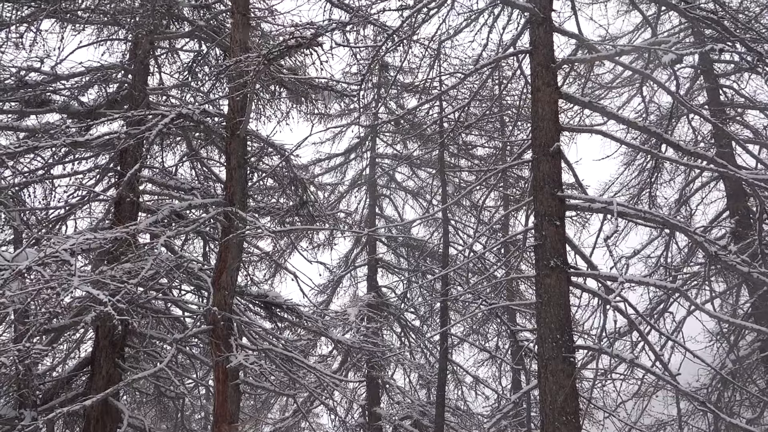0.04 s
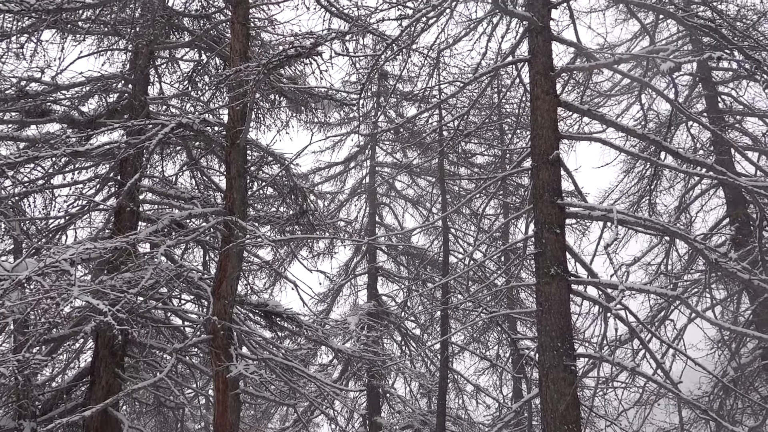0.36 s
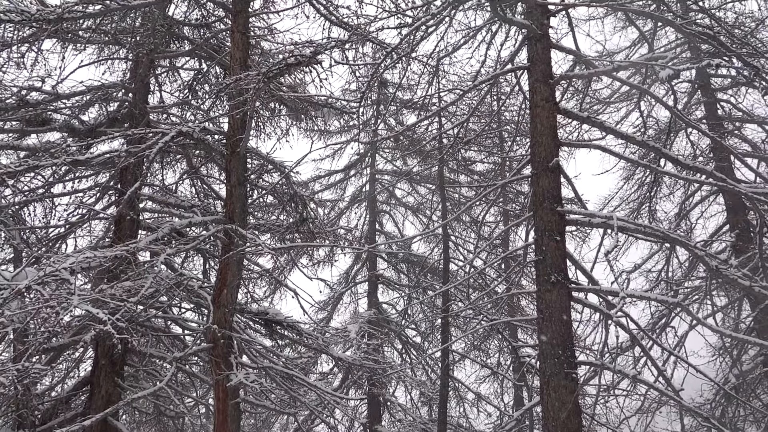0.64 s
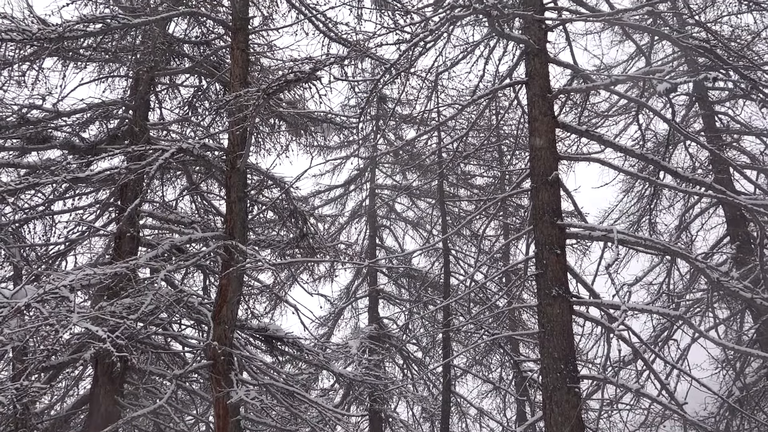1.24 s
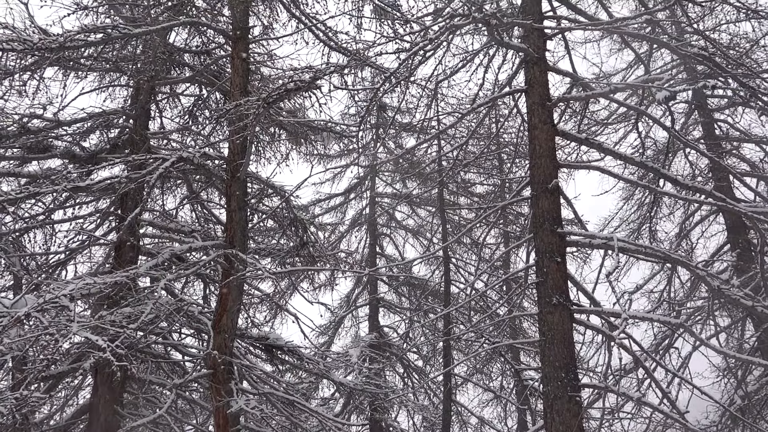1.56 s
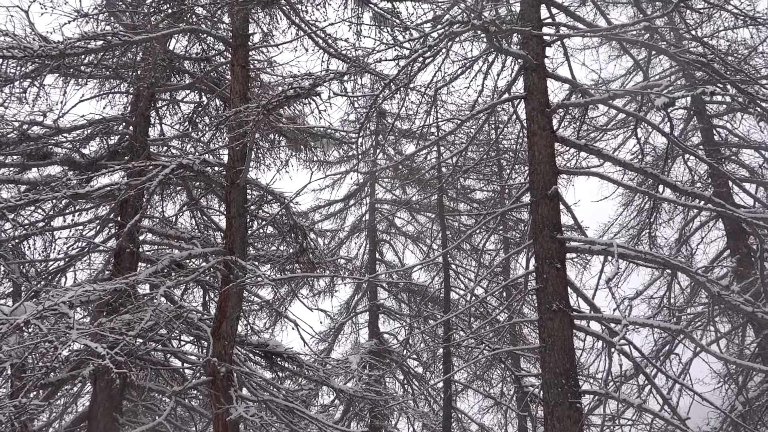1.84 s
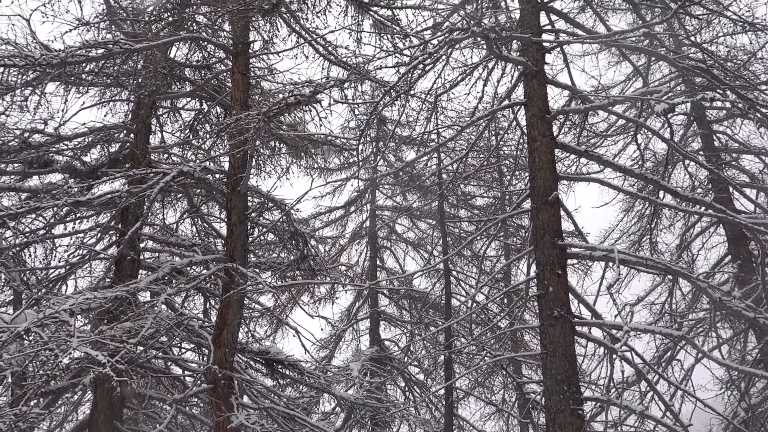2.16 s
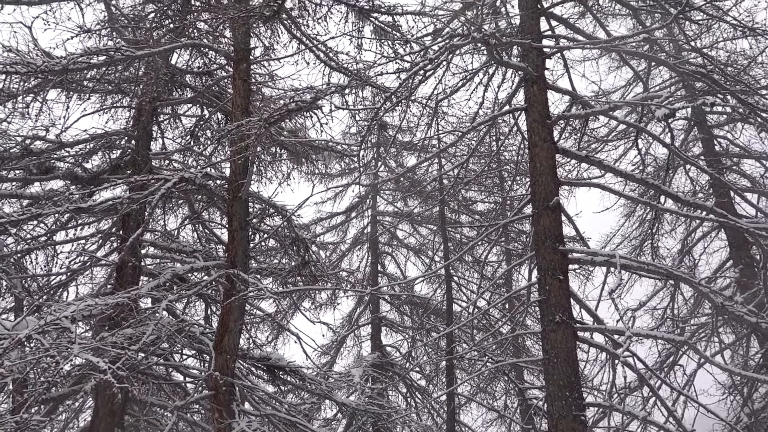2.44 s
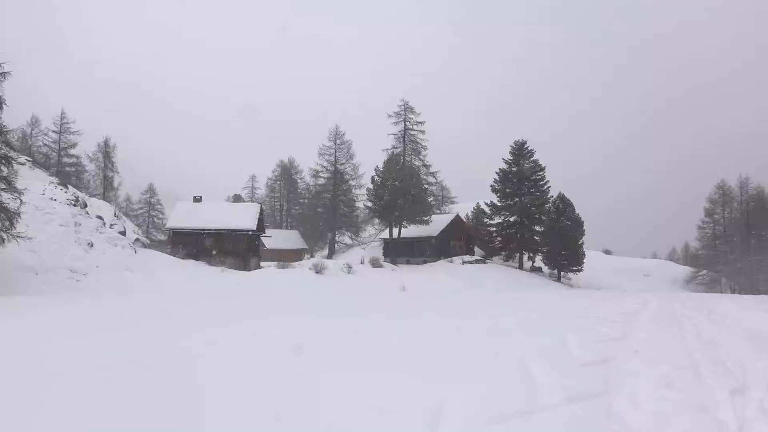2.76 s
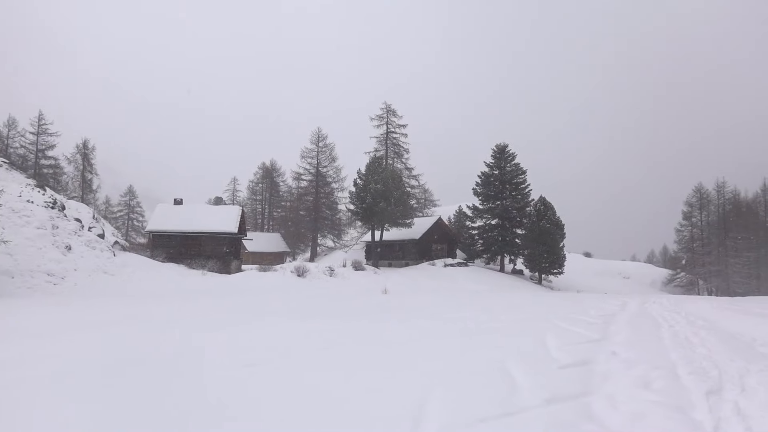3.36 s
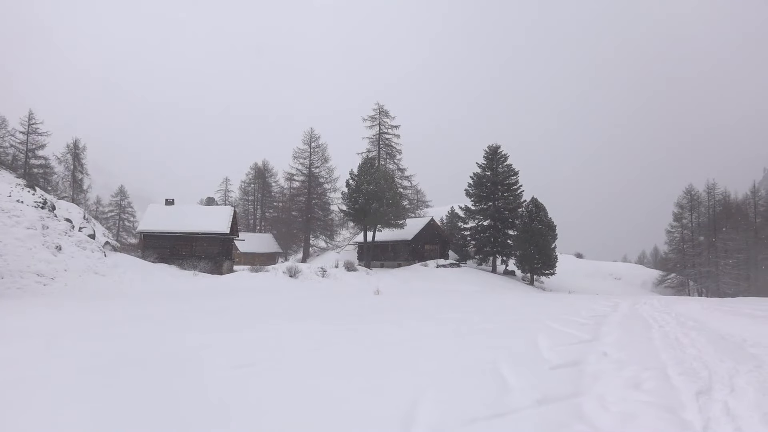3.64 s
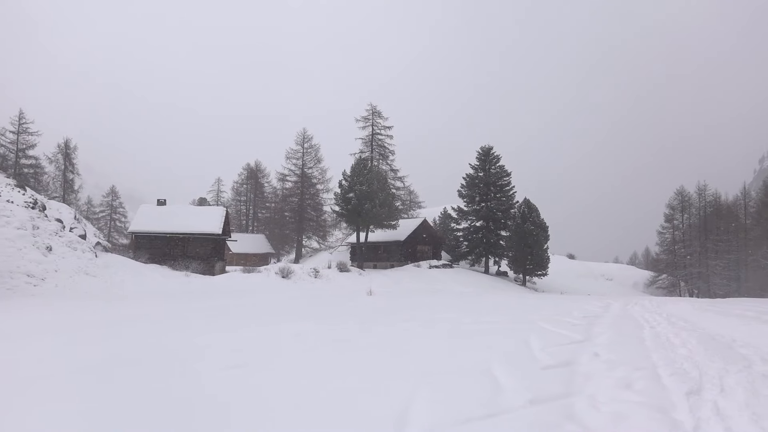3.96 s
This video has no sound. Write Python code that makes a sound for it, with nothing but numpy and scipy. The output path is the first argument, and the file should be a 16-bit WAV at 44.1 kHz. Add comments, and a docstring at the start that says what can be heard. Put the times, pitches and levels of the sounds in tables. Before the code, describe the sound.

Low wind rumbles and thumps on the microphone in snowy woods, over a soft hush, tiny snow ticks and light twig clicks. A gust passes, then the rumble continues in an open field with hardly any ticks.

```python
"""Snowy woods in the wind, heard by one microphone. Swirls of air rumble and thump on it, the trees
give a soft hush, grains of snow tick close by and twigs knock together. A gust rushes past after
about a second. Near the end the sound dips briefly and moves to an open field: duller air,
much the same rumble, hardly a tick."""
import sys
import numpy as np
from scipy import signal
from scipy.fft import rfft, irfft
from scipy.io import wavfile
from scipy.ndimage import uniform_filter1d

SR = 44100
rng = np.random.default_rng(int(sys.argv[2]) if len(sys.argv) > 2 else 0)


def waveform_to_disk(signal):
    """Save audio, clipped to [-1, 1], as 16-bit WAV at the path in sys.argv[1]."""
    frames = np.transpose(np.atleast_2d(signal))
    scaled = np.clip(frames, -1, 1) * 32767
    samples = np.round(scaled).astype(np.int16)
    wavfile.write(sys.argv[1], SR, samples)


N = 176400
T = np.arange(N) / SR
CHANGE_S = 2.838  # when the woods give way to the field


def amp(db):
    """Turn decibels into a number to multiply a sound by."""
    return 10 ** (np.asarray(db) / 20)


def curve(rows):
    """A volume that follows rows of time in seconds and level in dB."""
    return amp(np.interp(T, *np.array(rows).T))


def noise(colour):
    """Noise of strength 1, its tone shaped by rows of pitch in Hz and level in dB."""
    hz, db = np.array(colour, float).T
    freqs = np.maximum(np.fft.rfftfreq(N, 1 / SR), 1)
    gains = amp(np.interp(np.log(freqs), np.log(hz), db))
    shaped = irfft(rfft(rng.standard_normal(N)) * gains, N)
    return shaped / shaped.std()


def wander(per_s):
    """A smooth random drift, about 1 in size, that heads for a new value per_s times a second."""
    hold = max(int(SR / per_s), 2)
    steps = np.repeat(rng.standard_normal(N)[:N // hold + 1], hold)
    drift = uniform_filter1d(steps, hold)[:N]
    return drift / drift.std()


def add(out, start_s, sound):
    """Mix a short sound in at a given time."""
    i = int(np.clip(start_s * SR, 0, N - 1))
    out[i:i + len(sound)] += sound[:N - i]


def tap(hz, db, cycles):
    """One small contact: a short ring, strongest after the given cycles, and a faint noisy tail."""
    tail_db, tail_s = -25, .003
    t = T[:700]
    age = t * hz / cycles
    ring = np.sin(2 * np.pi * hz * t) * (age * np.exp(1 - age)) ** 2
    scatter = rng.standard_normal(len(t)) * np.exp(-t / tail_s)
    tail = np.convolve(scatter, ring / np.linalg.norm(ring))[:len(t)]
    return amp(db) * (ring + amp(tail_db) * tail)


def taps(rows, cycles):
    """Play one tap for each row of a table."""
    out = np.zeros(N)
    for start_s, hz, db in rows:
        add(out, start_s, tap(hz, db, cycles))
    return out


def rumble(colour):
    """Air swirling on the microphone: a deep churn whose strength follows the wind."""
    # The push of the wind. Each row: time in seconds, level in dB.
    wind_push = [(0, -26), (.12, -21.5), (.19, -20), (.3, -14.5), (.37, -39.5), (.5, -20.5), (.58, -27),
                 (.9, -24.5), (.97, -20.5), (1.12, -16.5), (1.19, -23), (1.28, -20), (1.34, -25.5),
                 (1.61, -15.5), (1.69, -22.5), (1.92, -14), (2.03, -18), (2.19, -19.5), (2.25, -40),
                 (2.46, -26), (2.8, -30), (2.92, -24), (3.14, -21), (3.22, -15.5), (3.31, -14.5),
                 (3.42, -32.5), (3.55, -28), (3.72, -23.5), (3.81, -15), (3.95, -21)]
    deep = noise(colour)
    power = uniform_filter1d(np.abs(signal.hilbert(deep)) ** 2, size=2400) / 2
    churn = deep / np.sqrt(power)  # even out the noise's own swells
    return churn * curve(wind_push) * amp(1.5 * wander(per_s=14))


def flutter():
    """Smaller swirls between the trees, coming in quick, low puffs."""
    # Their tone. Each row: pitch in Hz, level in dB.
    colour = [(30, -5.5), (65, 8.5), (110, 3), (160, -5.5), (240, -17), (2000, -75)]
    # Their strength. Each row: time in seconds, level in dB.
    strength = [(0, -43.5), (.36, -44.5), (.42, -43), (.6, -38.5), (.78, -40), (.88, -33.5), (1.1, -42),
                (1.4, -44), (1.6, -48), (1.9, -47), (2.1, -45), (2.3, -47), (2.55, -49.5), (2.8, -52)]
    return noise(colour) * curve(strength) * amp(2 * wander(per_s=34.87))


def woods_hush():
    """Wind in the trees makes a wavering hush, with a few soft rustles of snow."""
    # The tone of the hush. Each row: pitch in Hz, level in dB.
    colour = [(60, -3), (150, -1), (330, 2.5), (550, -0.5), (850, -9.5), (1300, -12), (1900, -11.5),
              (2800, -22.5), (4300, -21.5), (6000, -29), (9000, -30.5), (11500, -36), (16000, -37.5)]
    # Snow rustles. Each row: middle and half length in seconds, pitch in Hz,
    # width in octaves, level in dB.
    rustles = [(2.08, 0.12, 1550, 0.39, -55), (2.315, 0.064, 3900, 0.31, -64),
               (1.627, 0.069, 3800, 0.67, -60.5)]
    out = noise(colour) * amp(-48 + .5 * wander(per_s=6.38))
    for middle_s, half_s, hz, octaves, db in rustles:
        band = noise([(hz * 2 ** (k * octaves), -4 * k * k) for k in range(-5, 6)])
        swell = np.exp(-((T - middle_s) / half_s) ** 2 / 2)
        out += band * amp(db + 3.5 * wander(per_s=180)) * swell
    return out


def fine_snow():
    """Many faint grains land at random times, each with its own pitch and level."""
    grains_per_s, low_hz, high_hz = 120, 2510, 9600
    loudest_db, spread_db = -42, 7.5
    out = np.zeros(N)
    for when, pitch, softness in rng.random((int(grains_per_s * N / SR), 3)):
        hz = low_hz * (high_hz / low_hz) ** pitch
        db = loudest_db - spread_db * np.sqrt(softness)
        add(out, when * N / SR, tap(hz, db, cycles=1))
    return out


def thumps():
    """A sharp swirl hits the microphone as one swing of pressure, up and then down."""
    # Each row: middle of the swing in seconds, its width in seconds, level in dB.
    swirls = [(0.05, 0.0017, -32), (0.244, 0.0014, -23), (.414, 0.0038, -20), (.697, 0.0019, -22),
              (.809, 0.0028, -21), (.973, 0.00077, -20.5), (1.050, 0.0014, -22), (1.233, 0.0011, -18),
              (1.277, 0.0015, -18.5), (1.288, 0.0043, -16.5), (2.555, 0.0046, -29), (3.203, 0.0052, -17.5),
              (3.243, 0.0096, -17)]
    out = np.zeros(N)
    for middle_s, width_s, db in swirls:
        offset = (T - middle_s) / width_s
        out -= amp(db) * 2 * offset / (1 + offset * offset) ** 1.5
    return out


def snow_ticks():
    """Grains of snow land close by, each with a tiny, bright tick."""
    # Each row: start in seconds, pitch in Hz, level in dB.
    landings = [(0.089, 8300, -32), (.1406, 4300, -43), (.2105, 9400, -32), (0.2326, 3600, -38),
                (0.237, 6000, -36), (0.251, 7400, -35), (.2780, 9500, -40), (0.3302, 3080, -30.5),
                (.4710, 6900, -37), (.5007, 9900, -34), (0.7302, 4640, -32), (1.303, 4540, -32),
                (1.3427, 7800, -31), (1.3602, 7400, -37), (1.4203, 3670, -31), (1.4773, 7450, -35),
                (1.7142, 7800, -34), (1.7216, 4400, -37), (1.727, 8500, -42), (1.8820, 4200, -37),
                (1.9494, 3900, -30.5), (1.975, 7000, -39), (2.0276, 5000, -32), (2.1861, 9500, -35.5),
                (2.3235, 4480, -41), (2.4301, 3050, -40), (2.436, 3180, -27), (2.4403, 3700, -29),
                (2.4747, 5500, -39), (2.4912, 4430, -34), (2.4973, 3800, -32), (2.5206, 4400, -33),
                (2.5328, 4900, -36), (2.5927, 2780, -30.5), (2.6563, 7400, -42.5), (2.704, 10000, -39),
                (2.793, 8500, -53)]
    return taps(landings, cycles=.48)


def twig_knocks():
    """Twigs knock together, ringing lower and a little longer than the snow."""
    # Each row: start in seconds, pitch in Hz, level in dB.
    knocks = [(.2506, 2100, -35.5), (.7921, 2060, -33.5), (.9724, 2000, -30), (1.0853, 1970, -37),
              (1.4732, 1790, -35.5), (1.6532, 2190, -38.5), (1.7209, 1700, -29.5), (1.9873, 1850, -32)]
    return taps(knocks, cycles=1.24)


def gust():
    """A rough rush of air swells and dies away, with a spray of powder snow."""
    # The tones of the air and of the spray. Each row: pitch in Hz, level in dB.
    air_colour = [(40, -11), (90, 0), (170, -1), (330, -5), (600, -9.5), (1300, -10.5), (2000, -16.5),
                  (2900, -24), (4300, -26), (6000, -35), (9000, -35), (12000, -45), (16000, -48)]
    spray_colour = [(1500, -25), (4000, -5), (8500, 1), (12000, -10.5), (16000, -9)]
    # The gust's strength. Each row: time in seconds, level in dB.
    strength = [(0, -54.5), (.35, -53), (.8, -48.5), (.91, -42.5), (.975, -37.5), (1.02, -39.5),
                (1.15, -40.5), (1.29, -37.5), (1.33, -41), (1.45, -46), (1.6, -56), (2.2, -54.5)]
    air = noise(air_colour) * amp(2 * wander(per_s=150))
    spray = noise(spray_colour) * amp(-26 + 8 * wander(per_s=1200))
    return (air + spray) * curve(strength)


def field_hush():
    """Dull, distant air over open snow, slowly growing louder."""
    # Its tone. Each row: pitch in Hz, level in dB.
    colour = [(80, -4.5), (130, -1.5), (200, -0.5), (340, 0), (500, -0.5), (750, -4), (1000, -7),
              (1600, -9.5), (2000, -15.5), (2800, -20), (4000, -27), (5500, -30.5), (8000, -33.5),
              (11000, -35.5), (15500, -38)]
    start_db, rise_db_per_s = -49.5, 1.5
    level_db = start_db + rise_db_per_s * (T - CHANGE_S)
    return noise(colour) * amp(level_db + .5 * wander(per_s=4.53))


def scene():
    """The woods fade out and the field fades in; the wind beats on the microphone in both."""
    # The tone of the rumble in each place. Each row: pitch in Hz, level in dB.
    woods_colour = [(6, -4.5), (14, 3), (24, 1.5), (36, 0.5), (50, -14), (70, -20.5), (100, -32),
                    (150, -44), (300, -52.5), (2000, -110)]
    field_colour = [(6, -3.5), (14, 1), (24, 0), (34, -7), (50, -19.5), (70, -23.5), (100, -36.5),
                    (150, -48), (300, -57), (2000, -120)]
    half_gap_s, fade_s = .00069, .036
    fade_out = np.clip((CHANGE_S - half_gap_s - T) / fade_s, 0, 1)
    fade_in = np.clip((T - CHANGE_S - half_gap_s) / fade_s, 0, 1)
    woods = rumble(woods_colour) + flutter() + woods_hush() + gust() + fine_snow()
    field = rumble(field_colour) + field_hush() + amp(-10) * fine_snow()
    return (fade_out * woods + fade_in * field + thumps() + snow_ticks() + twig_knocks())[None]


def record(dry):
    """Cut away the very highest treble."""
    top_hz = 15850
    low_pass = signal.ellip(10, .1, 70, top_hz, fs=SR, output="sos")
    return signal.sosfilt(low_pass, dry)


dry = scene()
out = record(dry)
waveform_to_disk(out)
```